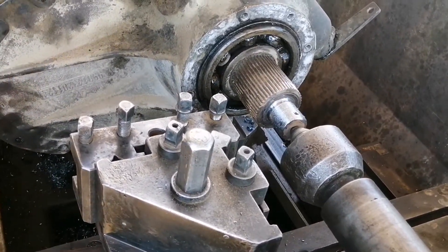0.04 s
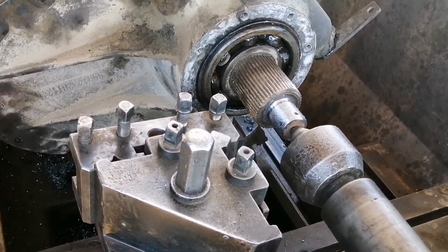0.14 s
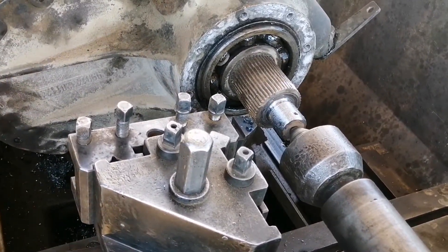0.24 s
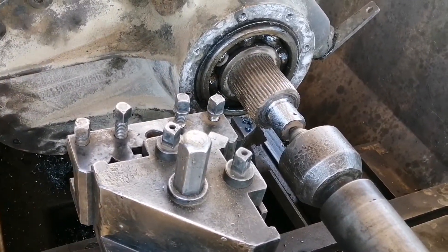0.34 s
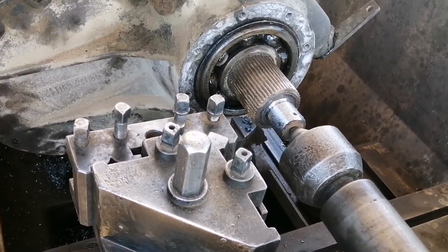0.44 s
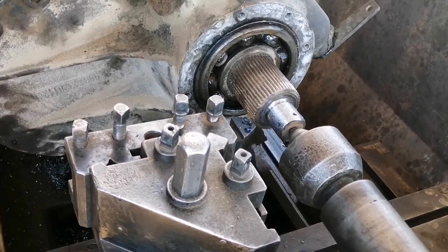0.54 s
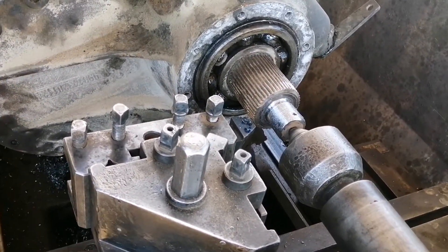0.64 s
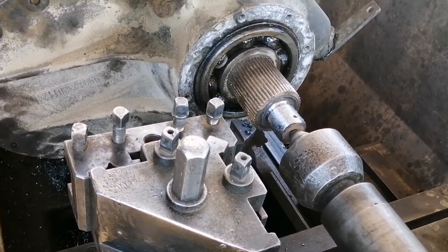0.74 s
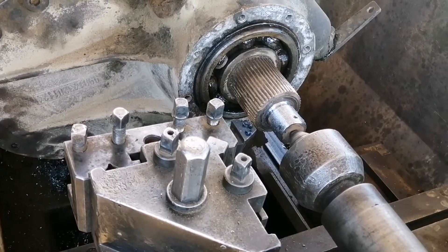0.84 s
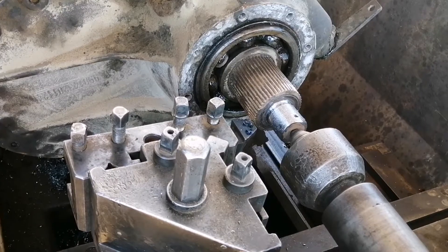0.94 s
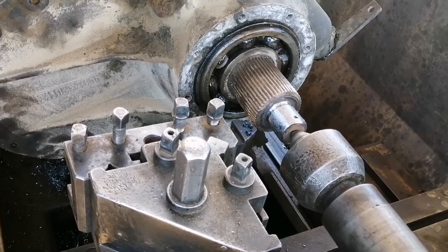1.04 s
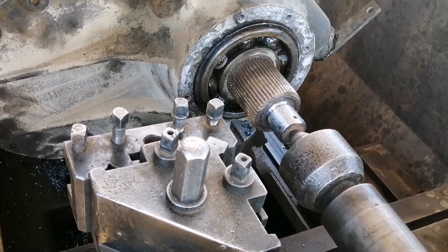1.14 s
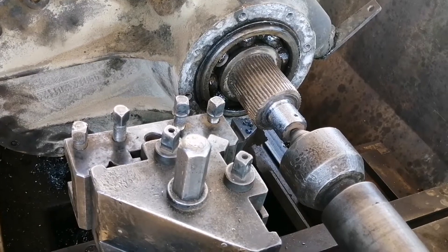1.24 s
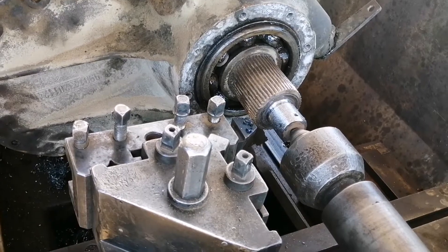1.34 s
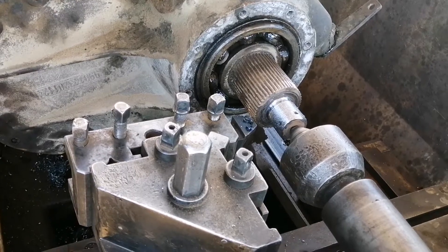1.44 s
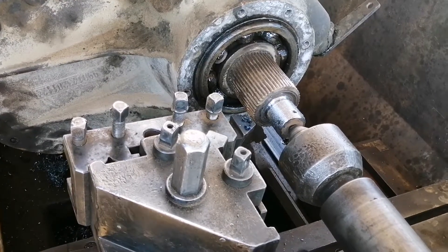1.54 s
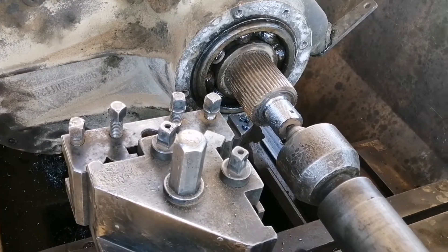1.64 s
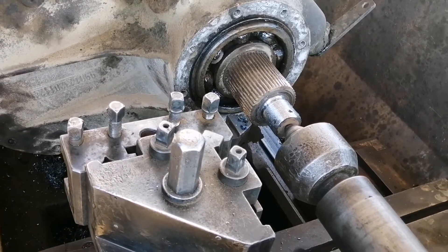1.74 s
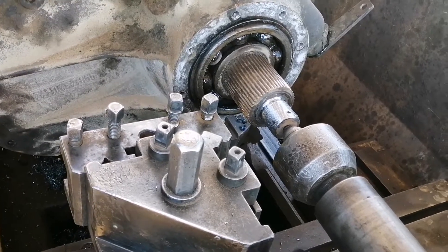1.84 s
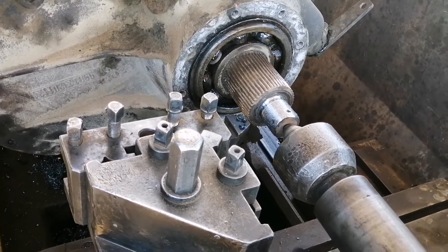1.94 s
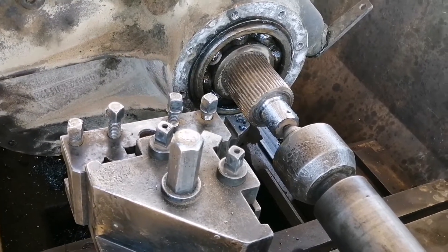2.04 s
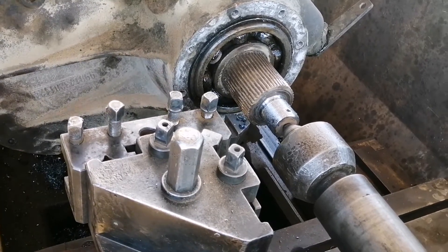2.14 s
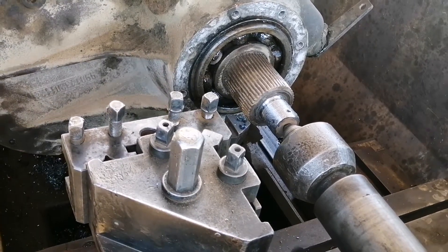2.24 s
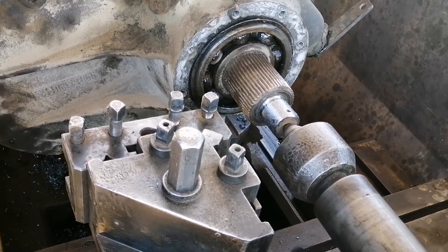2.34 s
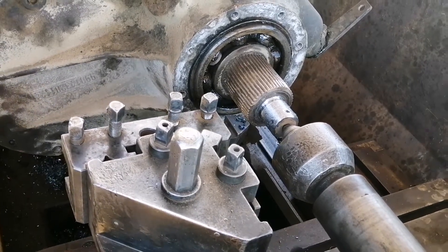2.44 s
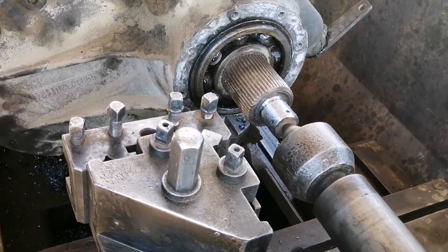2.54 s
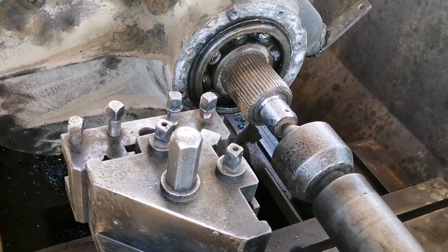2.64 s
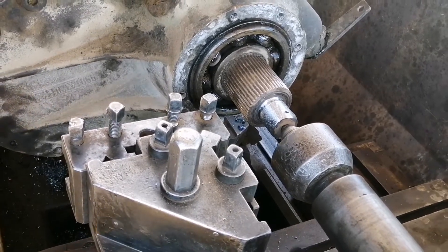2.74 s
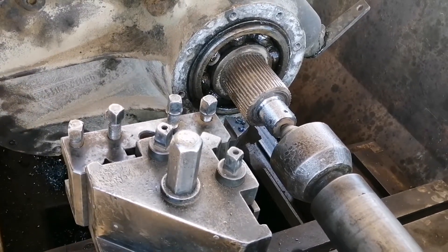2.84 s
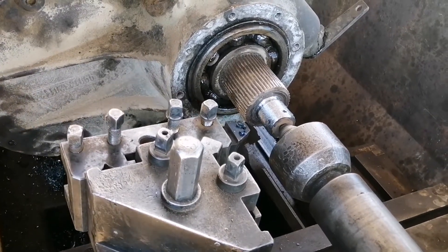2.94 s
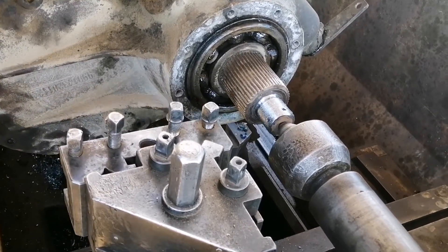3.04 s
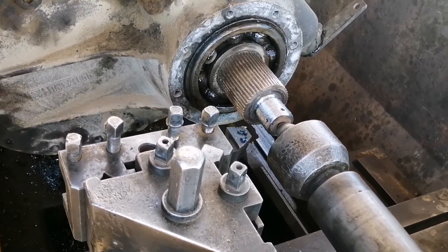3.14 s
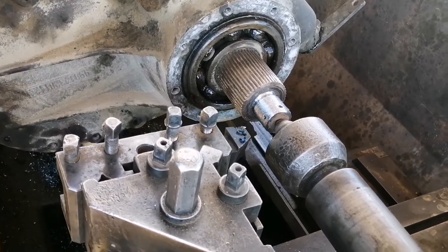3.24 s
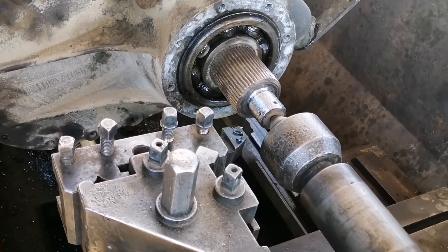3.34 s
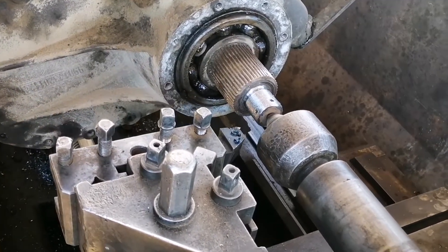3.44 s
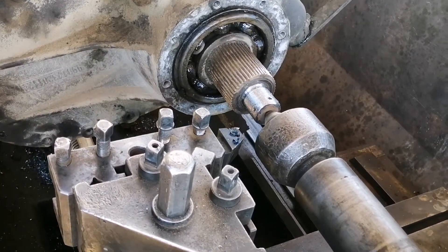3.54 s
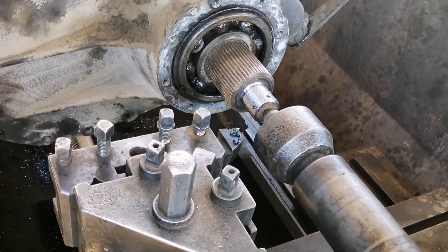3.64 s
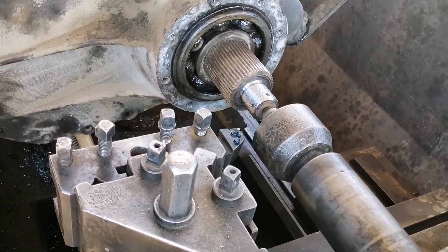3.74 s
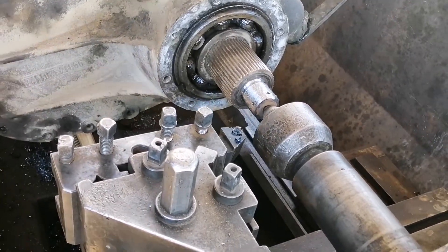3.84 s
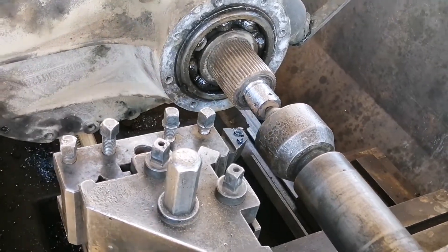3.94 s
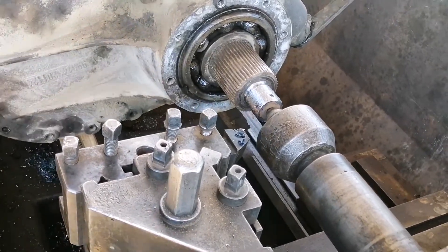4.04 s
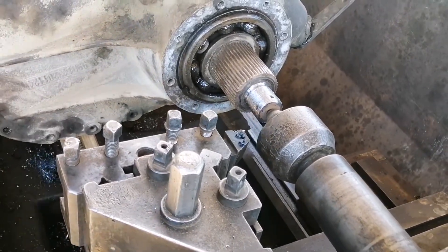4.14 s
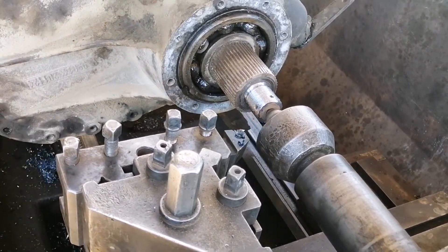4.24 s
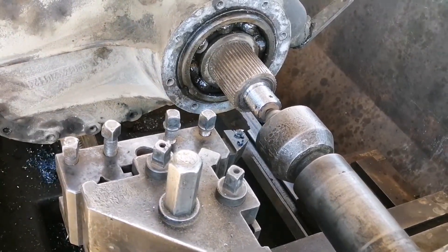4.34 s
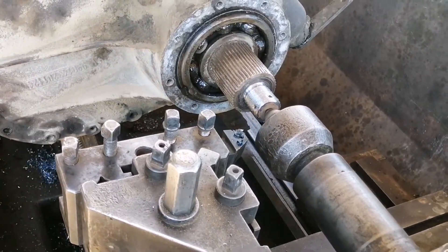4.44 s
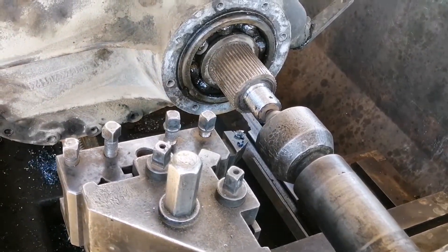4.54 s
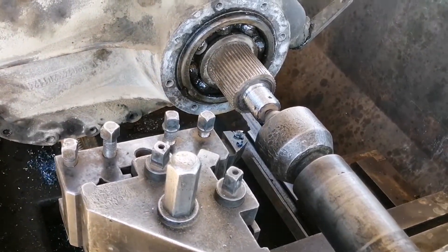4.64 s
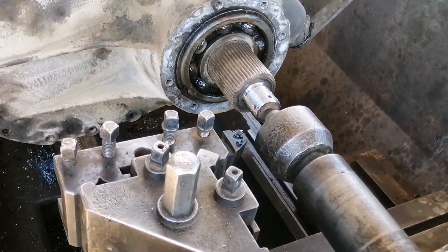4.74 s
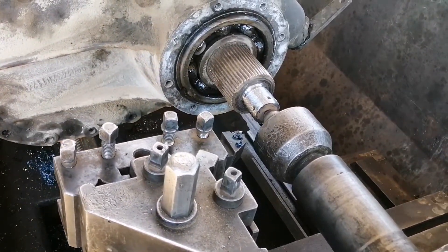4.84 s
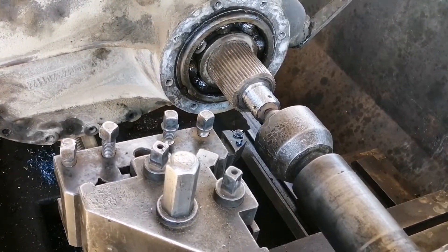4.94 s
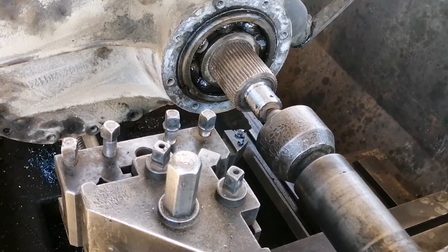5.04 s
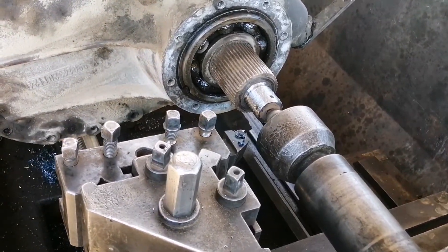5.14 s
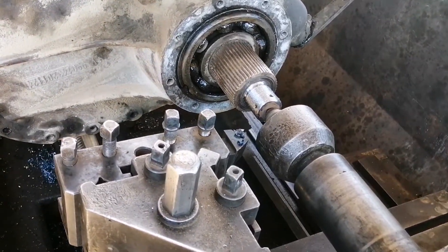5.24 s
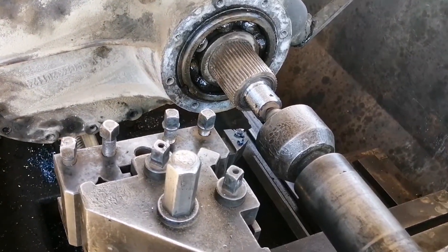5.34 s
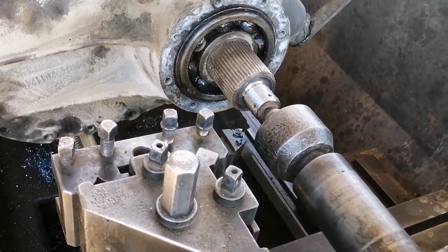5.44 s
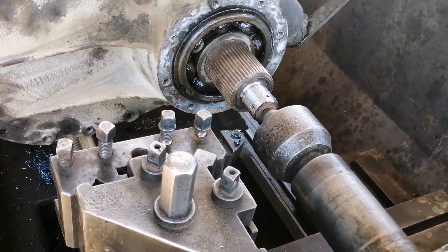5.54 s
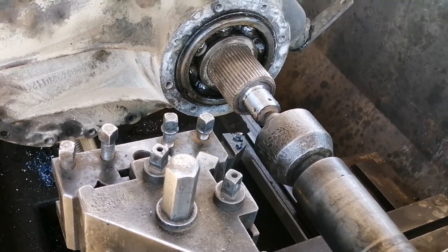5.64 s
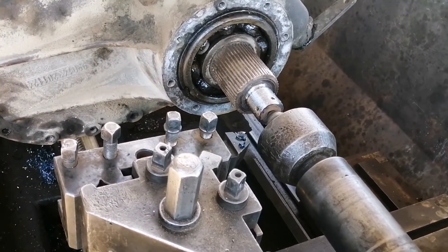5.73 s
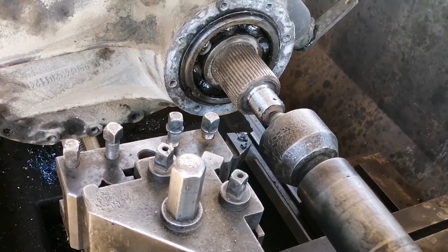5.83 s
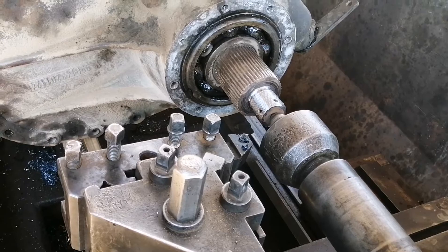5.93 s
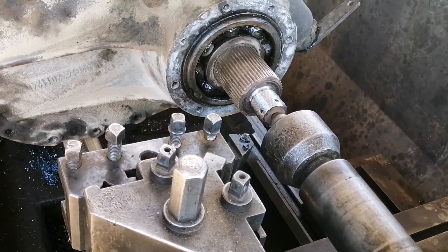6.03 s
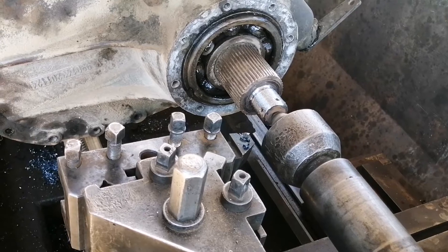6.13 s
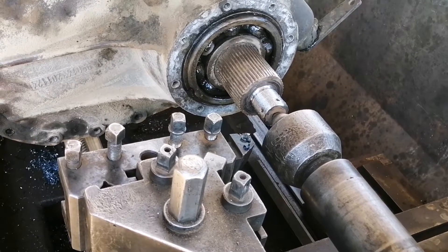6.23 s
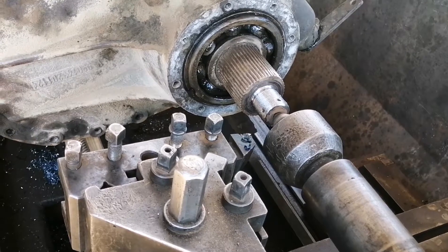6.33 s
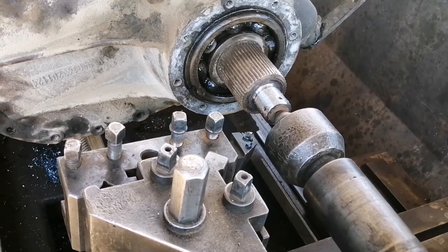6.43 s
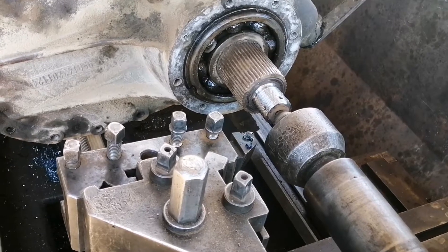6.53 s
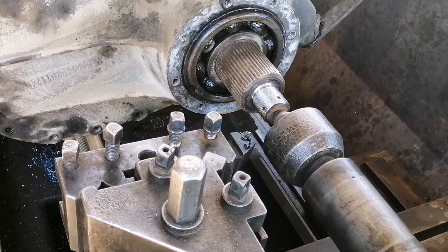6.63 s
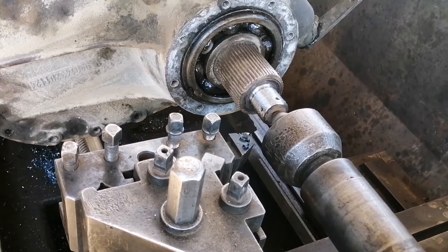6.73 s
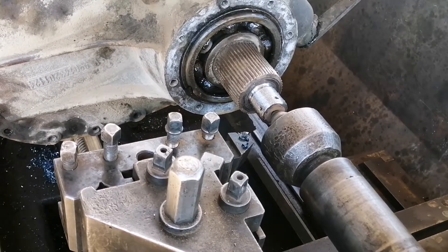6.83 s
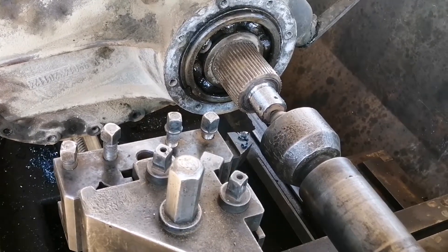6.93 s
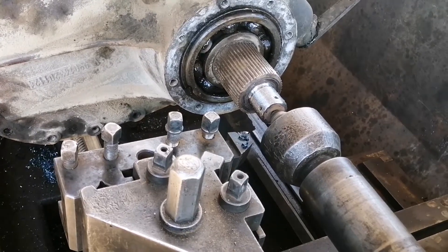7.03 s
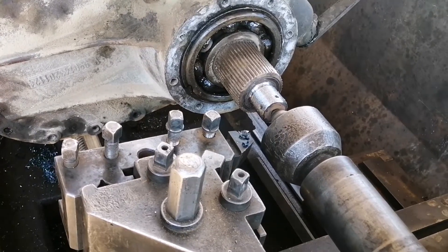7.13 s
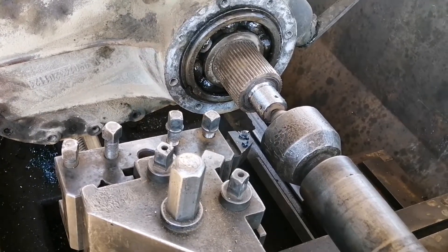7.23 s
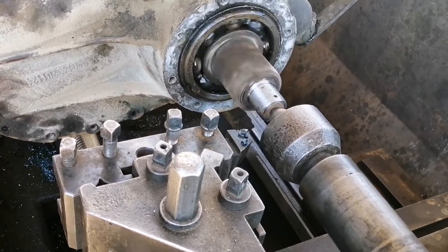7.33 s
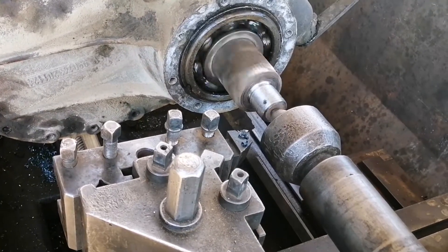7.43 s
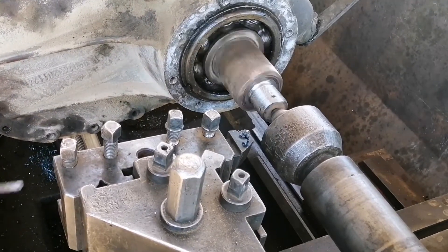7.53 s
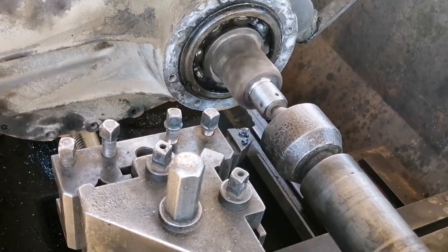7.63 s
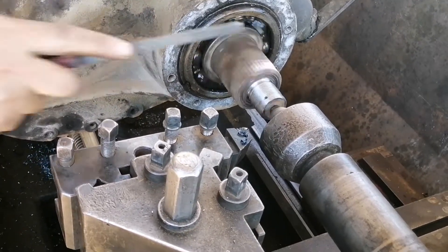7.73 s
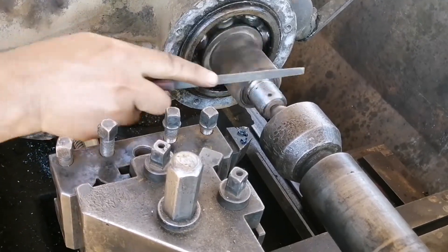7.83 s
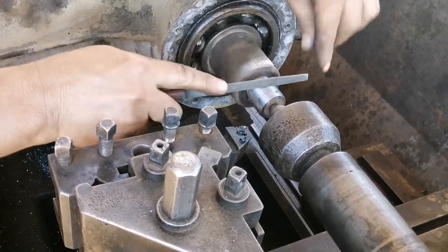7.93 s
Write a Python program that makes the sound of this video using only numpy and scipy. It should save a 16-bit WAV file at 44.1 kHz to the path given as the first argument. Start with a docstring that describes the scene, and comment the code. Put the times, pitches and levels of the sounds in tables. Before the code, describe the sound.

For the first 2.3 s there is only quiet workshop air, a thin steady hum, low soft rumble swells and faint rustles near 0.2-0.4 s and later 4.4 s. A hard, dry steel knock lands at 2.44 s, another at 3.05 s, with weaker knocks around them. Light irregular clinks and brief metal sliding run from 2.6 to 3.9 s, ending in a tiny bright ping at 3.92 s and a soft dull thud at 4.12 s. Quiet follows. At 5.4 s a lever scrapes and squeaks, clanking firmly at 5.56-5.65 s with a shrill chirp, then clicking at 5.94 s, more faintly around 6.1 and 6.4 s. At 7.37 s a loud gear clash starts the lathe abruptly; it runs to the end with dense rattling, gear whine surging several times around 660 Hz, and bed thumps. Close stereo, short diffuse echo.

```python
"""Quiet workshop air, soft rustles and low rumble come first; then steel parts knock, clink, slide and squeak.
A gear lever scrapes, squeals and clanks, and a metal lathe starts with a clash, heard just above its tool post.
Its gears whine and rattle, one tone surging several times, while the bed thumps.
Blows are filtered bursts of chatter plus decaying modes; the gears are wavering sines plus tooth noise;
the shop is coloured noise. Dry sources share a short diffuse echo."""
import sys
import numpy as np
from scipy import signal
from scipy.fft import rfft, irfft, next_fast_len
from scipy.io import wavfile

SR = 44100
rng = np.random.default_rng(int(sys.argv[2]) if len(sys.argv) > 2 else 0)


def output_pcm(signal):
    """Save a mono or channel-first signal as 16-bit PCM at the path in sys.argv[1].

    Samples are clipped to [-1, 1] before scaling.
    """
    pcm = np.clip(np.atleast_2d(signal).T, -1, 1) * 32767
    wavfile.write(sys.argv[1], SR, np.round(pcm).astype(np.int16))


N = 351918
TIME = np.arange(N) / SR

# All colour tables shape noise that is then scaled: only their relative levels count.
# gear tones, before the whine trim: (frequency [Hz], level [dB])
GEAR_TONES = [(238, -44), (366, -35), (436.0, -36), (512, -43), (559.9, -31.5), (662.1, -34.5),
              (834.4, -34.5), (1098, -42.5)]
WHINE_TRIM_DB, CASTING_DB, GUARD_DB = -4, -23, -27
# colours of the headstock casting and of the sheet guard: (frequency [Hz], level [dB])
CASTING_COLOUR = [(60, -55), (115, -6.5), (138, 0.5), (175, -5), (235, -3.5), (310, -7.5), (430, -3.5),
                  (640, -1.5), (735, -13), (850, -4), (935, -44), (1500, -69)]
GUARD_COLOUR = [(530, -29), (920, -2.5), (1460, -5.5), (2080, -11.5), (2950, -11.5), (3960, -17),
                (4400, -22.5), (5400, -24), (6900, -34), (9600, -39.5), (11500, -52), (15000, -72)]
# resonant panels of the guard: (frequency [Hz], width [Hz], relative level [dB])
GUARD_BANDS = [(1420, 120, -3), (2880, 240, -2), (3520, 130, -10), (5330, 89, -13)]
# one gear pair binds and sings out: (time [s], level [dB])
SURGES = [(7.44, -21.5), (7.555, -20), (7.69, -17), (7.85, -25), (7.97, -29)]
START_S, SURGE_HZ = 7.372, 658
# unevenness of the tooth chatter and of the guard's panels
CHATTER_DB, CHATTER_PER_S, FLARE_DB, FLARES_PER_S = 1.7, 130, 3.5, 30
# dull bed thumps as the gears drop in, then take up their slack: (time [s], level [dB])
BUMPS = [(5.558, -19.5), (6.110, -35.5), (7.385, -14), (7.510, -21), (7.585, -23), (7.651, -17),
         (7.769, -20), (7.867, -15.5), (7.938, -22)]
# modes of the thumping bed: (frequency [Hz], relative level [dB], t60 [s])
BUMP_MODES = [(97.6, -3, 0.23), (122.3, 9, 0.13), (210, 0.5, 0.14)]

# scrapes and clanks of the lever and the gears it shifts:
# (time [s], level [dB], chatter decay [s], bass [dB], treble [dB])
LEVER_BLOWS = [(5.355, -44, 0.16, 3, -6), (5.396, -31, 0.035, -1, -7), (5.559, -23.5, 0.016, 5, -1),
               (5.574, -20, 0.0098, -0.5, -8), (5.607, -23.5, 0.022, -5.5, 4), (5.650, -33, 0.035, -4, -8),
               (5.842, -41, 0.017, 6, -34), (5.937, -22, 0.0061, -14, 12), (6.033, -33, 0.008, -10, -11),
               (6.054, -31.5, 0.025, 2, 7), (6.109, -32, 0.02, -16, -12), (6.38, -47, 0.051, -26, -6),
               (6.424, -32.5, 0.017, -1, 7.5), (7.383, -18, 0.0086, -8, -0.5), (7.402, -15, 0.013, 3, -14)]
# colour of the lever: (frequency [Hz], level [dB])
LEVER_COLOUR = [(41, -17), (70, -17.5), (154, -12), (360, -10), (756, -5.5), (1010, -10), (1330, -6.5),
                (1700, -8.5), (2970, -10.5), (5210, -16.5), (7470, -22.5), (8740, -19.5), (15000, -47)]
# modes of the lever: (frequency [Hz], relative level [dB], t60 [s])
LEVER_MODES = [(3036, 10, 0.069), (4570, 2.9, 0.055), (5100, 2.6, 0.11), (9000, 1.5, 0.059)]
# the clash of the drive engaging starts just ahead of the gears and swells as the teeth bite
CLASH_LEAD_S, CLASH_DB, CLASH_RISE_S, CLASH_DECAY_S = 0.0063, -6, 0.086, 0.026
# the lever slips and squeals: (time [s], level [dB])
SQUEALS = [(5.41, -46), (5.624, -34)]
# partials of the shrill squeal: (frequency [Hz], relative level [dB])
SQUEAL_PARTIALS = [(8613, 0.5), (11400, -20), (12800, -16), (14300, -20)]

# heavy blows, level before the knock trim:
# (time [s], level [dB], chatter decay [s], treble [dB], boom of the bed [dB])
KNOCKS = [(2.38, -35.5, 0.015, -29, -59), (2.422, -40, 0.01, -17, -43.5), (2.441, -13.5, 0.0034, 2, -47.5),
          (2.822, -36.5, 0.013, 9, -55), (2.900, -39, 0.024, 16, -60), (2.915, -29.5, 0.008, -21, -43),
          (3.035, -42, 0.029, 10, -46), (3.054, -15.5, 0.0063, -0.5, -43), (3.071, -32.5, 0.012, -30, -55),
          (3.093, -23, 0.0076, -51, -47), (3.14, -28.5, 0.0079, -25, -53),
          (3.171, -33.5, 0.0054, 16, -49.5)]
KNOCK_TRIM_DB = 1.5
# colour of the tool post: (frequency [Hz], level [dB])
POST_COLOUR = [(47, -34), (80, -8), (320, 5.5), (620, -1.5), (850, -4), (1250, -4.5), (1520, -11),
               (1750, -4), (2230, -9.5), (2590, -6), (3220, -16.5), (3910, -16.5), (4450, -22.5),
               (10300, -48), (14000, -82)]
# modes of the tool post: (frequency [Hz], relative level [dB], t60 [s])
POST_MODES = [(780, -7, 0.07), (1250, 16, 0.042), (1940, 2, 0.054), (2610, -2, 0.047)]
# a contact shorter than this loses bass, more for every halving of its length
SOFT_CONTACT_S, BASS_LOSS_DB_PER_OCTAVE = 0.0093, 18
# colour of the bed booming after a blow: (frequency [Hz], level [dB])
BED_COLOUR = [(50, -26), (110, 2.5), (170, 3), (340, -6.5), (600, -10), (1500, -23), (3800, -27.5),
              (14000, -78)]
BOOM_LAG_S, BOOM_RISE_S, BOOM_FALL_S = 0.022, 0.026, 0.078

# light clinks of loose parts and of the lever's catch, level before the clink trim:
# (time [s], level [dB], treble [dB], ring pitch [Hz])
CLINKS = [(2.639, -31.5, -12.5, 3264), (2.756, -36.5, 3.5, 3270), (2.837, -34, 22, 3580),
          (2.847, -29, 6, 4300), (2.863, -27.5, 9, 2700), (2.903, -27.5, 2, 2510), (2.928, -38, -4, 3350),
          (2.986, -36.5, -0.5, 3470), (3.247, -35, -12, 1450), (3.275, -25.5, -2, 3270),
          (2.879, -44, 13, 3700), (3.379, -29, 6, 2870), (3.388, -31.5, 6, 3050), (3.402, -30.5, 2, 3520),
          (3.48, -35, -28, 2750), (3.491, -33, -6, 3120), (3.504, -28, -7, 3280), (3.540, -34, -14, 2890),
          (3.562, -35.5, -19, 2540), (3.603, -30.5, 8, 3020), (3.625, -35, 6, 3200),
          (3.650, -36.5, -14, 3480), (3.877, -28, -6, 3250), (5.609, -23, 5, 4240),
          (5.934, -27.5, 10, 3780), (6.396, -44.5, 4, 4260)]
# colour of a small part: (frequency [Hz], level [dB])
CLINK_COLOUR = [(180, -48), (429, -18.5), (834, -15.5), (2040, -12.5), (3370, -6), (3960, -16),
                (4440, -15.5), (6140, -20), (6870, -19.5), (8630, -37.5), (11600, -37), (14500, -59)]
# modes of a small part: (multiple of its ring pitch [ratio], relative level [dB], t60 [s])
CLINK_MODES = [(0.998, 1.5, 0.027), (1.21, 4.5, 0.019), (2.06, -18, 0.027)]
CLINK_TRIM_DB = 1.0
CLINK_DECAY_S = 0.0026  # shortest chatter; bright contacts lengthen it
# parts slide over each other between the clinks: (time [s], level [dB])
SLIDES = [(2.775, -54), (2.86, -52), (2.912, -42), (3.14, -45), (3.235, -49), (3.32, -47.5), (3.41, -47),
          (3.63, -62), (3.695, -45.5)]
# colour of the sliding: (frequency [Hz], level [dB])
SLIDE_COLOUR = [(250, -29), (1000, 11), (3200, 5), (5500, -13), (14000, -52)]
CATCHES_PER_S, SLIDE_GRAIN_DB = 450, 6.5
# one small bright ping, then one soft thud: (time [s], level [dB], rise [s])
PIN = (3.920, -45.5, 0.00086)
THUD = (4.121, -26, 0.0032)
# their modes: (frequency [Hz], relative level [dB], t60 [s])
PIN_MODES = [(6654, -2, .09), (9240, 0, .08), (11490, 4, 0.1)]
THUD_MODES = [(226, -8, 0.13), (321, 2.5, 0.095), (406, -7, 0.081), (507, -12, 0.063), (1900, -29, 0.3)]
# brief squeaks of steel on steel: (time [s], level [dB], pitch [Hz], swell and fade [s])
SQUEAKS = [(2.957, -51, 7700, 0.0047), (3.036, -56, 5530, 0.0045), (5.380, -46, 3740, 0.0083),
           (5.427, -36, 3704, 0.019), (5.465, -56.5, 5100, 0.066)]

# colours of the shop air and of a distant wash of noise: (frequency [Hz], level [dB])
AIR_COLOUR = [(40, -26), (75, -3), (140, -10), (350, -11), (620, -11), (3100, -23.5), (9500, -36.5),
              (12000, -48.5), (15000, -60)]
WASH_COLOUR = [(40, -34.5), (85, 3.5), (130, -7), (235, -2.5), (350, -8), (500, -8), (900, -7),
               (3500, -32.5), (7000, -72)]
# level of the distant wash: (time [s], level [dB])
WASH_LEVEL = [(0, -63.5), (2.2, -58.5), (3.5, -50), (3.95, -55), (4.5, -50), (7.3, -52.5)]
AIR_DB, HUM_DB, WASH_DRIFT_DB = -60.5, -65.5, 0.9
WASH_HISS_DB = -13.5  # thin hiss that rides on the wash, relative to it
# narrow resonances of the steady hum: (frequency [Hz], width [Hz], relative level [dB])
HUM_BANDS = [(600, 18, 1), (822.3, 31, 2.5), (1662, 120, -8), (2340, 70, -8.5), (3480, 160, -11),
             (3653, 60, -10.5), (4650, 150, -23)]
# swells of the low rumble, over a slowly growing floor: (time [s], level [dB])
RUMBLE_SWELLS = [(.87, -46.5), (1.45, -51), (1.66, -47.5), (2.16, -49.5), (3.0, -47.5), (4.28, -51)]
RUMBLE_START_DB, RUMBLE_GROWTH_DB_PER_S = -66, 2
# soft rustles: (time [s], level [dB])
RUSTLES = [(.18, -54.5), (.36, -61), (.44, -57.5), (4.35, -55), (4.43, -51.5)]
# colours of rumble and rustle: (frequency [Hz], level [dB])
RUMBLE_COLOUR = [(15, -16.5), (44, 6.5), (60, -3.5), (100, -37), (200, -77)]
RUSTLE_COLOUR = [(300, -29), (900, 17), (2000, 15), (5000, -2.5), (10000, -14), (14000, -57)]

# shop reverberation: (frequency [Hz], t60 [s])
ROOM_T60 = [(150, 0.29), (700, 0.23), (3000, 0.24), (10000, 0.15)]
# stereo colour, the right side fuller in bass and brighter: (frequency [Hz], left minus right [dB])
MIC_BALANCE = [(130, -4.5), (450, 0.1), (1200, -0.9), (6000, -2), (8700, -13), (14000, -5.5)]
TOP_HZ = 15100


def lathe():
    """Meshing gears sing, their teeth rattle the casting and the sheet guard, and the bed thumps."""
    age = np.maximum(TIME - START_S, 0)
    clock = np.cumsum(1 + 0.00352 * walk(14)) / SR  # a slightly fluttering speed
    whine = gear_whine(clock)
    casting, guard = tooth_rattle(clock)
    bumps = np.zeros((2, N))
    for s, db in BUMPS:
        add(bumps, s, amp(db) * ring(BUMP_MODES, rise=0.0099))
    # the light guard answers at once, the heavy casting builds up more slowly
    slow_start = 1 - np.exp(-(age / 0.033) ** 2)
    quick_start = 1 - np.exp(-age / 0.0048)
    x = (casting + whine) * slow_start + guard * quick_start
    near = stereo(x, 0.13, 0.49, 1070, -1.1) + stereo(bumps, 0, 0.2, 100)
    return near + room(x, -12.5)


def gear_whine(clock):
    """Tooth errors make each gear tone waver in level and phase; a binding pair surges."""
    whine = np.zeros((2, N))
    for hz, db in GEAR_TONES:
        level = amp(db + 5.1 * walk(36))
        whine[0] += level * np.sqrt(2) * np.sin(2 * np.pi * hz * clock + 0.46 * walk(40))
    whine *= amp(WHINE_TRIM_DB)
    surge = np.sqrt(2) * np.sin(2 * np.pi * SURGE_HZ * clock)
    whine[0] += swells(SURGES, rise_s=0.014, fall_s=0.02) * surge
    return whine


def tooth_rattle(clock):
    """Random tooth impacts, strongest once per turn of the fast shaft, shake the casting and the guard."""
    turn = 1 + 0.086 * np.sin(2 * np.pi * 56 * clock)
    load = turn * amp(CHATTER_DB * walk(CHATTER_PER_S))  # the chatter clusters
    impacts = rng.random((2, N)) < 3500 / SR
    teeth = unit((impacts + 0.51) * noise() * load)
    casting = colour(teeth, CASTING_COLOUR) * amp(CASTING_DB)
    panels = np.zeros((2, N))
    for hz, width, db in GUARD_BANDS:  # each panel flares and fades on its own
        panels += resonate(teeth, [(hz, width, 0)]) * amp(db + FLARE_DB * walk(FLARES_PER_S))
    guard = (colour(teeth, GUARD_COLOUR) + amp(-19) * panels) * amp(GUARD_DB)
    return casting, guard


def gear_lever():
    """The lever scrapes, squeals and drops the gears into mesh; a swelling clash marks the start."""
    x = np.zeros((2, N))
    for s, db, decay, bass_db, treble_db in LEVER_BLOWS:
        hit = blow(LEVER_COLOUR, LEVER_MODES, decay, bass_db, treble_db,
                   grain=0.48, spot_db=0.5, ring_db=-14, rise_s=0.0033)
        add(x, s, amp(db) * hit)
    clash = blow(LEVER_COLOUR, LEVER_MODES, CLASH_DECAY_S, bass_db=8.5, treble_db=-12,
                 grain=0.18, spot_db=3.5, ring_db=-17, rise_s=CLASH_RISE_S)
    add(x, START_S - CLASH_LEAD_S, amp(CLASH_DB) * clash)
    gain = swells(SQUEALS, rise_s=0.0088, fall_s=0.014)
    shrill = squeal(SQUEAL_PARTIALS, gain, waver=0.0043, flutter_db=5.5)
    return stereo(x, 0.253, 0.5, 2000) + stereo(shrill, 0.26, 0, 1000) + room(x, -5.5)


def heavy_knocks():
    """Blows near the tool post; each sets the bed booming."""
    x = np.zeros((2, N))
    for s, db, decay, treble_db, _ in KNOCKS:
        bass_db = BASS_LOSS_DB_PER_OCTAVE * min(np.log2(decay / SOFT_CONTACT_S), 0)
        hit = blow(POST_COLOUR, POST_MODES, decay, bass_db, treble_db,
                   grain=0.18, spot_db=3.7, ring_db=-25, rise_s=0.23 * decay)
        add(x, s, amp(db + KNOCK_TRIM_DB) * hit)
    booms = [(s + BOOM_LAG_S, boom_db) for s, *_, boom_db in KNOCKS]
    x += colour(noise(), BED_COLOUR) * swells(booms, BOOM_RISE_S, BOOM_FALL_S)
    return stereo(x, 0.067, 0.37, 280) + room(x, -11.0)


def small_parts():
    """Light parts slide and clink as struck steel; a small bright ping and a soft thud ring as modes."""
    clinks, pin, thud = np.zeros((3, 2, N))
    for s, db, treble_db, hz in CLINKS:
        add(clinks, s, amp(db) * clink(treble_db, hz))
    # sliding steel catches on tiny ridges, hundreds of times a second
    catches = noise() * amp(SLIDE_GRAIN_DB * walk(CATCHES_PER_S))
    clinks += colour(catches, SLIDE_COLOUR) * swells(SLIDES, rise_s=0.042, fall_s=0.035)
    pin_s, pin_db, pin_rise_s = PIN
    add(clinks, pin_s, amp(-35.5) * clink(treble_db=15.0, hz=6050))  # the tick that sets off the ping
    add(pin, pin_s, amp(pin_db) * ring(PIN_MODES, pin_rise_s))
    thud_s, thud_db, thud_rise_s = THUD
    add(thud, thud_s, amp(thud_db) * ring(THUD_MODES, thud_rise_s))
    near = stereo(clinks, 0.25, 0.38, 890) + stereo(pin, 0, 0, 1200) + stereo(thud, 0, 0.1, 1200, 9.7)
    return near + room(clinks + pin + thud, -10.5)


def clink(treble_db, hz):
    """A struck small part pings with three modes; a brighter contact gives more tick and less ping."""
    modes = [(hz * multiple, db, t60) for multiple, db, t60 in CLINK_MODES]
    grind = max(treble_db, 0)  # bright contacts skid, so their chatter lasts longer
    decay = CLINK_DECAY_S * (1 + grind / 16)
    hit = blow(CLINK_COLOUR, modes, decay, 0, treble_db,
               grain=0.38, spot_db=2.5, ring_db=-0.4 * grind, rise_s=0.0012)
    return amp(CLINK_TRIM_DB) * hit


def squeaks():
    """Steel sticks on steel for a moment and sings one rough note."""
    x = np.zeros((2, N))
    for s, db, hz, length in SQUEAKS:
        gain = swells([(s, db)], length, length)
        x += squeal([(hz, 0)], gain, waver=0.0066, flutter_db=6.0)
    return stereo(x, 0.22, 0, 1000) + room(x, -12.5)


def workshop():
    """Coloured noise makes steady air, a thin hum, a distant wash, low rumble and soft rustles."""
    air = colour(noise(), AIR_COLOUR) * amp(AIR_DB + 0.5 * walk(4.7))
    hum = resonate(noise(), HUM_BANDS) * amp(HUM_DB)
    wash_db = curve(WASH_LEVEL)
    wash = colour(noise(), WASH_COLOUR) * amp(wash_db + WASH_DRIFT_DB * walk(7.5))
    rumble_floor = amp(RUMBLE_START_DB + RUMBLE_GROWTH_DB_PER_S * TIME)
    rumble_gain = rumble_floor + swells(RUMBLE_SWELLS, rise_s=0.096, fall_s=0.13)
    rumble = colour(noise(), RUMBLE_COLOUR) * rumble_gain
    rustle_gain = amp(wash_db + WASH_HISS_DB) + swells(RUSTLES, rise_s=0.013, fall_s=0.042)
    rustle = colour(noise(), RUSTLE_COLOUR) * rustle_gain * amp(1.4 * walk(45))
    bed = stereo(air + hum + wash + rustle, -0.31, 0.5, 720, -1.2)
    return bed + stereo(rumble, -0.27, 0.34, 110, 3.7)


def blow(body, modes, decay, bass_db, treble_db, grain, spot_db, ring_db, rise_s):
    """Steel on steel: a dying chatter of tiny contacts, coloured by the part, which then rings on."""
    t = TIME[:2 ** 14]
    f = bins(len(t))
    grains = np.exp(grain * np.repeat(rng.standard_normal(2 ** 9), 2 ** 5))
    contacts = unit(rng.standard_normal((2, len(t))) * grains)
    # each struck spot favours its own modes
    spot = spot_db * np.interp(f / 170, np.arange(2 ** 8), rng.standard_normal(2 ** 8))
    bass = bass_db / (1 + (f / 600) ** 4)
    treble = treble_db / (1 + (5200 / (f + 1)) ** 4)
    envelope = np.exp(-t / decay) * (1 - np.exp(-t / rise_s))
    chatter = shape(contacts * envelope, at_hz(body, f) + spot + bass + treble)
    return chatter + amp(ring_db) * ring(modes, decay / 2)


def ring(modes, rise):
    """Decaying modes that swell while the contact lasts."""
    t = TIME[:2 ** 14]
    hz, db, t60 = np.transpose(modes)[:, :, None]
    phase = 2 * np.pi * rng.random((2, len(modes), 1))
    share = amp(db) / np.linalg.norm(amp(db))
    fade = share * 1000 ** (-t / t60)
    tones = (fade * np.sin(2 * np.pi * hz * t + phase)).sum(1)
    return np.sqrt(2) * tones * (1 - np.exp(-t / rise))


def squeal(partials, gain, waver, flutter_db):
    """Sticking and slipping steel sings with an unsteady pitch and level."""
    clock = np.cumsum(1 + waver * walk(120)) / SR
    song = np.zeros(N)
    for hz, db in partials:
        song += amp(db + flutter_db * walk(110)) * np.sin(2 * np.pi * hz * clock)
    return np.sqrt(2) * song * gain * np.array([[1], [0]])  # all in the middle


def room(x, wet_db):
    """Diffuse echo of the shop: noise dying octave by octave, the top treble fastest."""
    t = TIME[:2 ** 15]
    f, tail = bins(len(t)), 0
    hiss = rfft(rng.standard_normal((2, len(t))))
    octave = np.round(np.log2(np.maximum(f, 2 ** 6)))
    for k in np.unique(octave):
        tail = tail + irfft(hiss * (octave == k)) * 1000 ** (-t / at_hz(ROOM_T60, 2 ** k))
    tail = unit(tail * (1 - np.exp(-t / 0.0049))) / np.sqrt(len(t))
    echo = signal.fftconvolve(x[:1], tail, axes=1)[:, :N]
    return amp(wet_db) * stereo(echo, 0, 0.5, 770)


def stereo(pair, lag_ms, spread, corner_hz, pan_db=0):
    """Mid and side to left and right: alike in the bass, apart in the treble; the right lags by lag_ms."""
    size = next_fast_len(N)
    f = bins(size)
    share = spread * f ** 2 / (f ** 2 + corner_hz ** 2)
    mid, side = rfft(pair, size) * np.sqrt([1 - share, share])
    lag = np.exp(-2j * np.pi * f * lag_ms / 1000)
    left = (mid + side) * amp(pan_db / 2)
    right = (mid - side) * lag * amp(-pan_db / 2)
    return irfft([left, right], size)[:, :N]


def resonate(x, bands):
    """Drive narrow resonances; the result has rms 1."""
    size = next_fast_len(N)
    f = bins(size)
    response = sum(amp(db) / (1 + 2j * (f - hz) / width) ** 2 for hz, width, db in bands)
    return unit(irfft(rfft(x, size) * response, size)[..., :N])


def colour(x, points):
    """Give a steady sound a spectrum, at rms 1."""
    size = next_fast_len(N)
    return unit(irfft(rfft(x, size) * amp(at_hz(points, bins(size))), size)[..., :N])


def shape(x, db):
    """Causal filter of unit power gain with the given relative dB at each bin."""
    size = x.shape[-1]
    cepstrum = irfft(np.log(unit(amp(db))), size)
    cepstrum[1:size // 2] *= 2  # fold for minimum phase
    cepstrum[size // 2 + 1:] = 0
    return irfft(rfft(x) * np.exp(rfft(cepstrum)), size)


def swells(rows, rise_s, fall_s):
    """Gain that grows towards each peak (time [s], level [dB]) and dies away after it."""
    gain = np.zeros(N)
    for s, db in rows:
        distance = np.maximum((s - TIME) / rise_s, (TIME - s) / fall_s)
        gain += amp(db) * np.exp(-distance.clip(0, 20))
    return gain


def walk(rate):
    """Random drift through `rate` knots a second, at rms 1."""
    knots = rng.standard_normal(2 ** 13)
    return unit(np.interp(TIME * rate, np.arange(len(knots)), knots))


def noise():
    """Two unrelated white noises."""
    return rng.standard_normal((2, N))


def add(track, s, x):
    """Mix a sound in at time s."""
    i = int(s * SR)
    track[..., i:i + x.shape[-1]] += x[..., :N - i]


def curve(rows):
    """A control table (time [s], value) at every sample."""
    return np.interp(TIME, *np.transpose(rows))


def at_hz(points, f):
    """Read (frequency [Hz], value) points on a log-frequency axis."""
    hz, value = np.transpose(points)
    return np.interp(np.log(f + 1), np.log(hz), value)


def bins(size):
    """Frequencies of a spectrum in Hz."""
    return np.arange(size // 2 + 1) * SR / size


def amp(db):
    """Decibels to amplitude."""
    return np.exp(np.asarray(db) * (np.log(10) / 20))


def unit(x):
    """Scale to rms 1."""
    return x / np.sqrt(np.mean(x ** 2))


def scene():
    """Setting up, engaging the gears and running, over the sound of the shop."""
    return lathe() + gear_lever() + heavy_knocks() + small_parts() + squeaks() + workshop()


def record(dry):
    """Two microphones of different colour, their summed power kept; a steep low-pass cuts the top."""
    size = next_fast_len(N)
    lean = amp(at_hz(MIC_BALANCE, bins(size)))
    gains = np.array([lean, np.ones_like(lean)]) * np.sqrt(2 / (1 + lean ** 2))
    heard = irfft(rfft(dry, size) * gains, size)[:, :N]
    low_pass = signal.ellip(10, 0.2, 80, TOP_HZ, fs=SR, output="sos")
    return signal.sosfilt(low_pass, heard)


dry = scene()
out = record(dry)
output_pcm(out)
```